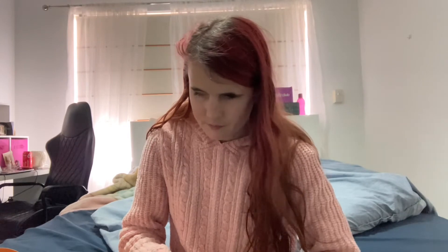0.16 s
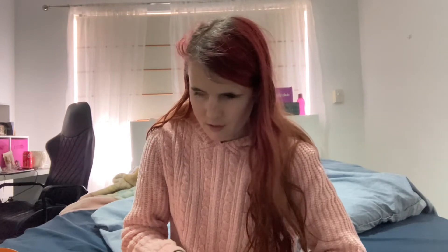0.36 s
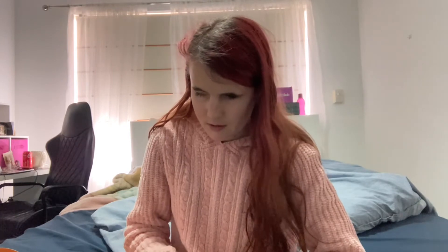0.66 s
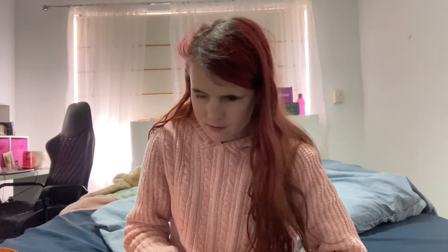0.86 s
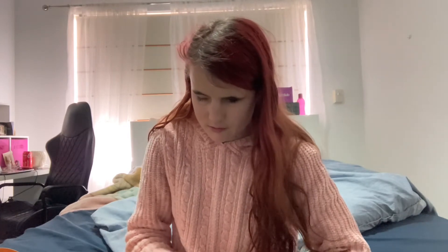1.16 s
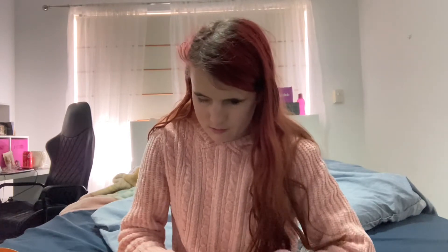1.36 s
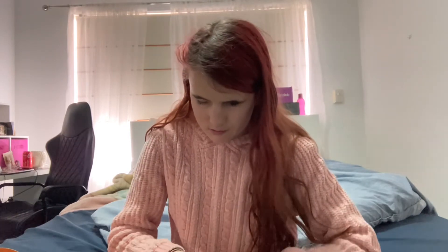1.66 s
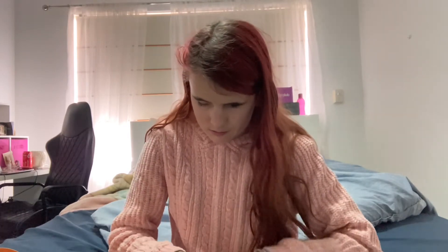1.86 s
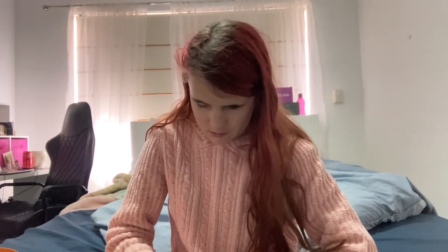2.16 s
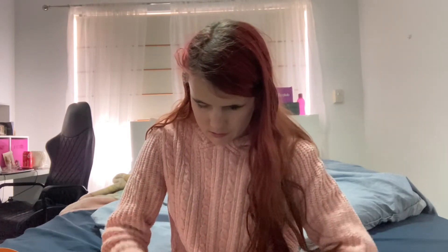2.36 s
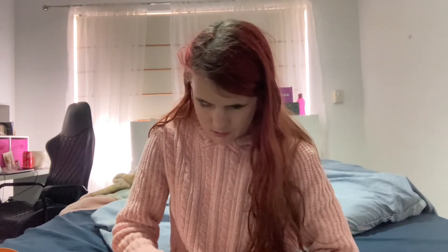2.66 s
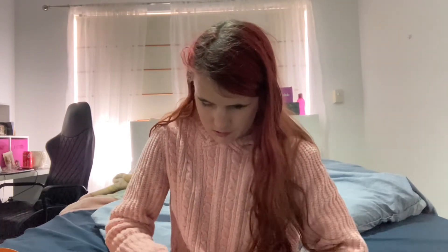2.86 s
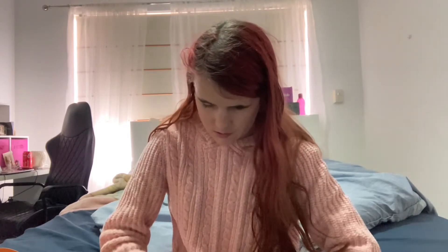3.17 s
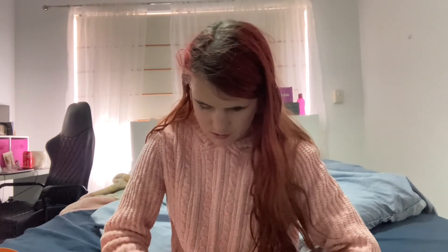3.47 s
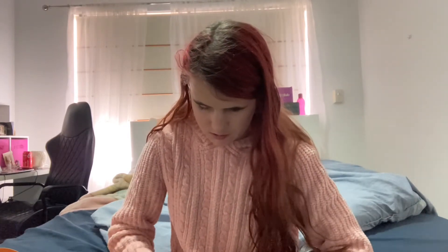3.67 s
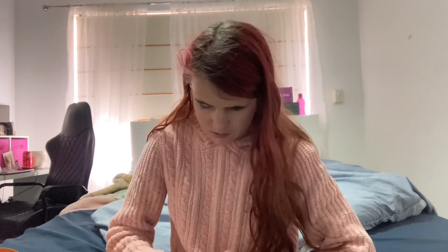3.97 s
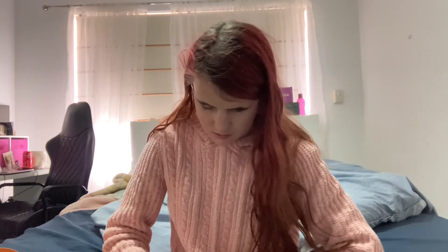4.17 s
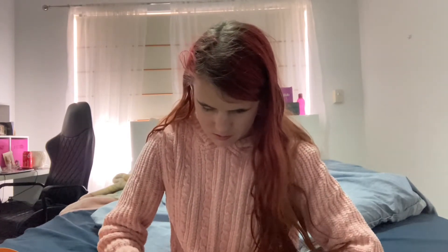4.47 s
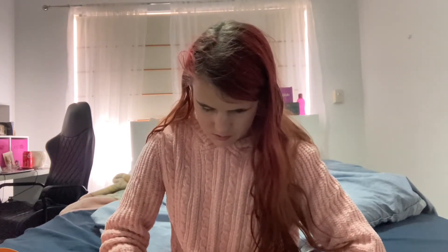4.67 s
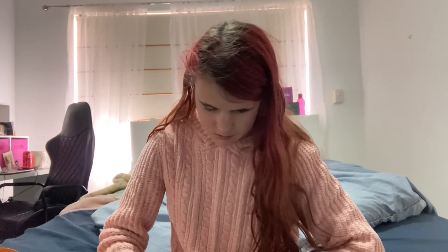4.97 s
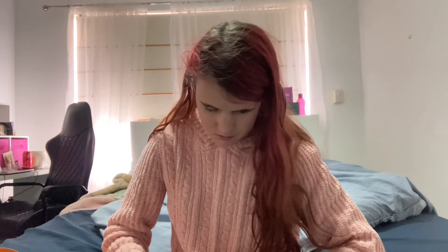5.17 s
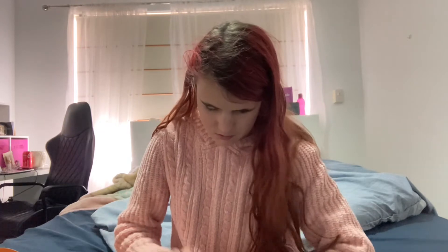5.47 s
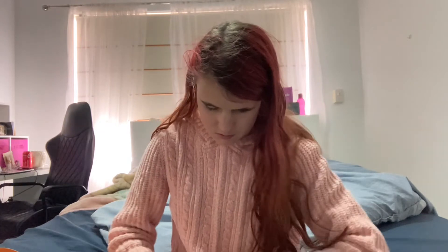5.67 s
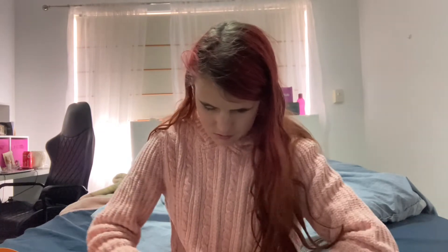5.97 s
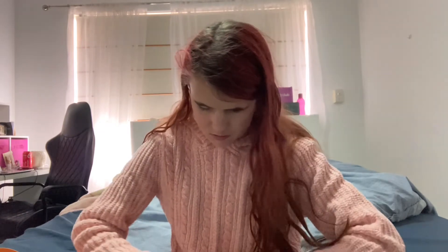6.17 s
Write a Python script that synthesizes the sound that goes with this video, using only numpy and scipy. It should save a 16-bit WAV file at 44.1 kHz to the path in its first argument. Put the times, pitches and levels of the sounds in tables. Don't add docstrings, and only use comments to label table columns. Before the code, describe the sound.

Stiff plastic sweet wrapper crackles close up in a small bedroom, sparse bright snaps first, then a hard squeeze, crumpling and a final burst.

```python
import sys
import numpy as np
from scipy import signal
from scipy.fft import rfft, irfft, next_fast_len
from scipy.io import wavfile

SR = 44100
rng = np.random.default_rng(int(sys.argv[2]) if len(sys.argv) > 2 else 0)


def master(y):
    cut = np.clip(np.atleast_2d(y).T, -1, 1)
    pcm = np.round(cut * 32767)
    wavfile.write(sys.argv[1], SR, pcm.astype(np.int16))


def amplitude_ratio(level_db):
    exponent = np.asarray(level_db, float) / 20
    return 10 ** exponent


N = 279153


def shape(x, table, to_gain):
    size = next_fast_len(x.shape[-1] + 4096)
    hz, value = np.transpose(table)
    axis_hz = np.arange(size // 2 + 1) * SR / size + 1
    gain = to_gain(np.interp(np.log(axis_hz), np.log(np.maximum(hz, 1)), value))
    return irfft(rfft(x, size) * gain, size)[..., :x.shape[-1]]


def scatter(start_s, rows):
    at = (start_s * SR).astype(int)[:, None] + np.arange(rows.shape[1])
    return np.bincount(at.ravel(), rows.ravel(), N + 8192)[:N]


def colour(table):
    points_hz, points_db = np.transpose(table)
    return lambda hz: amplitude_ratio(np.interp(np.log(hz), np.log(points_hz), points_db))


# pitch in Hz, gain in dB.
FILM_VOICE = [(150, 0), (400, 8.5), (1500, 6.5), (4000, 8.5), (6500, 6), (10000, -3)]


def panel(centre_hz, slope_db):
    return lambda hz: colour(FILM_VOICE)(hz) * amplitude_ratio(-slope_db * abs(np.log2(hz / centre_hz[:, None])))


def rings(start_s, db, hz, cycles, sag, size):
    turns = hz[:, None] * np.arange(size) / SR
    swell = (1 - np.exp(-turns / 0.76)) * np.exp(-turns / cycles)
    wave = np.sin(2 * np.pi * np.log1p(sag * turns) / sag)
    return scatter(start_s, amplitude_ratio(db)[:, None] * swell * wave)


def cracks(start_s, db, decay_s, size, gain, rise_s=0.000065, first=6):
    lead = 64
    t = np.arange(size) / SR
    envelope = (1 - np.exp(-t / rise_s)) * np.exp(-t / decay_s)
    slips = np.clip(rng.standard_normal((len(start_s), size)), -1.6, 1.6) ** 3 * envelope
    slips[:, 4] += first
    click = slips * (np.arange(size) == 4)
    heard = []
    for rows in (slips, click):
        rows = np.pad(rows, ((0, 0), (lead, 512 - size - lead)))
        rows = irfft(rfft(rows) * gain(np.arange(257) * SR / 512 + 1))
        rows = rows / np.sqrt(np.sum(rows ** 2, axis=1, keepdims=True))
        heard.append(scatter(np.maximum(start_s - lead / SR, 0), amplitude_ratio(db)[:, None] * rows))
    return np.array(heard)


# pitch in Hz, density in dB per Hz.
HUSH_COLOUR = [(15, -52), (25, 0), (76, -5.5), (979, -31.5), (2020, -38), (6620, -34), (9030, -28.5),
               (10800, -60), (12000, -49), (15600, -61), (22000, -120)]


def hush():
    noise = shape(rng.standard_normal((2, N)), HUSH_COLOUR, amplitude_ratio)
    return noise * amplitude_ratio(-72.5) / noise.std()


# pitch in Hz, time to fall 60 dB in seconds.
ROOM_DECAY = [(200, 0.67), (1000, 0.27), (3000, 0.25), (8000, 0.25), (16000, 0.26)]
# pitch in Hz, level in dB.
ROOM_COLOUR = [(200, -18.5), (700, -21.5), (2500, -16.5), (6000, -22.5), (9000, -27.5), (13000, -32),
               (16000, -36)]


def tail():
    t = np.arange(SR // 2) / SR
    decay_hz, decay_s = np.transpose(ROOM_DECAY)
    out = 0
    for hz in 125 * 2. ** np.arange(8):
        band = shape(rng.standard_normal(len(t)), [(hz / 2, 0), (hz, 1), (hz * 2, 0)], np.sqrt)
        t60 = np.interp(np.log(hz), np.log(decay_hz), decay_s)
        out = out + band * amplitude_ratio(-60 * t / t60)
    gather = 1 - np.exp(-(t / 0.004) ** 2)
    return shape(out * gather, ROOM_COLOUR, amplitude_ratio) * amplitude_ratio(-12.0)


def room(bag, count):
    place = np.repeat(rng.integers(0, count, N // 1024 + 1), 1024)[:N]
    return sum(signal.fftconvolve(bag * (place == k), tail())[:N] for k in range(count))


# delay in seconds, level in dB.
ECHOES = [
    (.0029, -24),
    (.0096, -22.5),
]


def nearby(bag):
    return bag + sum(amplitude_ratio(db) * np.roll(bag, int(delay_s * SR)) for delay_s, db in ECHOES)


# pitch in Hz, time to fall 60 dB in seconds, level in dB.
DESK_HUM = (62, 0.86, -45)


def bump():
    hz, t60, db = DESK_HUM
    t = np.maximum(np.arange(N) / SR - 5.293, 0)
    envelope = (1 - np.exp(-t / 0.022)) * amplitude_ratio(-60 * t / t60)
    return amplitude_ratio(db) * envelope * np.sin(2 * np.pi * hz * t)


# start in seconds,
# level in dB, pitch in Hz.
PUFFS = [(0.388, -52.5, 483), (0.535, -57, 520), (0.645, -47, 536), (1.048, -47, 392), (1.146, -46, 526),
         (1.418, -42.5, 555), (1.9, -49, 463), (2.156, -47.5, 557), (2.282, -36, 640), (2.307, -37, 365),
         (2.487, -39.5, 514), (2.846, -41.5, 526), (3.237, -34.5, 510), (3.413, -41.5, 490),
         (3.539, -39, 480), (3.599, -35.5, 527), (3.837, -42.5, 496), (3.883, -39, 554), (4.149, -44, 450),
         (4.172, -44.5, 418), (4.327, -47, 530), (4.658, -48.5, 396), (5.289, -42, 496), (5.6, -45.5, 480),
         (5.812, -40, 608), (6.084, -44, 480), (6.123, -39, 464), (6.259, -34, 332), (6.285, -30.5, 490),
         (2.29, -39.5, 119), (5.3, -44, 123)]


def puffs():
    start_s, db, hz = np.transpose(PUFFS)
    return rings(start_s, db + 11.5, hz, cycles=1.3, sag=0.0017, size=1500)


def unrest(at, steady_db, snap_db):
    settle_s = 0.019
    since = at[:, None] - np.transpose(SNAPS)[0]
    settling = np.where(since > 0, amplitude_ratio(snap_db) * np.exp(-abs(since) / settle_s), 0)
    return 10 * np.log10(amplitude_ratio(steady_db) ** 2 + np.sum(settling ** 2, axis=1))


# time in seconds, effort in dB.
KNEADING = [(0, -71), (.36, -53.5), (.52, -56), (.78, -62), (1.75, -55.5), (2.32, -45), (2.68, -44.5),
            (2.92, -64), (3.05, -41), (3.38, -35), (3.641, -50), (3.76, -44.5), (4.2, -44.5), (4.9, -59),
            (5.3, -52.5), (5.7, -51.5), (6.08, -35.5), (6.33, -49)]
# pitch in Hz, gain in dB.
CRACK_COLOUR = [(2000, -18), (4000, -9.5), (6000, 6.5), (8000, 10), (9500, 12.5), (12000, 9.5),
                (14000, 0.5), (16500, -6.5)]


def rustle(count):
    knead_s, knead_db = np.transpose(KNEADING)
    _, crack_db, _, ring_db = np.transpose(SNAPS)
    bright_at, bright_luck, dull_at, dull_luck, pitch = rng.random((count, 5)).T

    at = bright_at * N / SR
    effort_db = np.interp(at, knead_s, knead_db)
    steady_db = -5.5 - 67.5 + 1.7866 * (effort_db + 55.5)
    level_db = unrest(at, steady_db, crack_db - 36)
    level_db = level_db - 3 * np.log(np.maximum(bright_luck, .15)) + 13
    bright = cracks(at, level_db, decay_s=0.00063, size=60, gain=colour(CRACK_COLOUR))

    at = dull_at * N / SR
    effort_db = np.interp(at, knead_s, knead_db)
    level_db = unrest(at, effort_db - 7, ring_db - 4.5)
    level_db = level_db - 3 * np.log(np.maximum(dull_luck, .12)) + 10.0
    patch = panel(450 * amplitude_ratio(27.1 * pitch), slope_db=7.5)
    return bright + cracks(at, level_db, decay_s=0.000098, size=200, gain=patch)


def creak(bag, size):
    swell = rng.standard_normal(size) * np.exp(-np.arange(size)[::-1] / SR / 0.0067)
    return amplitude_ratio(-40) * signal.fftconvolve(bag, swell)[size:size + N]


# start in seconds, crack level in dB, ring of the film in Hz, ring level in dB.
CREASES = [(0.0271, -50.5, 2070, -42), (0.1547, -87.5, 3120, -57.0), (0.2453, -39, 3060.0, -35.5),
           (0.2574, -71.0, 2220, -45), (0.3032, -63.5, 2820, -41), (0.3859, -85.0, 820.0, -51.5),
           (0.4189, -28.0, 2320, -28.5), (0.4199, -30, 2300, -47), (0.4506, -15.5, 2030, -29.5),
           (0.4932, -17.5, 3220, -33.5), (0.5026, -38, 2760.0, -53), (0.5224, -29, 2230, -35.5),
           (0.536, -31, 2400, -28.5), (0.5457, -23.5, 3800, -32.0), (0.5495, -33.0, 3100.0, -48),
           (0.5527, -30, 4050.0, -39), (0.6431, -37.5, 2080, -37.5), (0.8303, -67.0, 2000, -45.5),
           (0.8429, -29.5, 4780.0, -44), (0.8589, -58.0, 2800.0, -49), (0.8704, -62, 1890.0, -39),
           (0.8757, -28.5, 3880.0, -29.5), (0.9367, -38, 1640.0, -45.5), (0.9646, -39.5, 4390.0, -47),
           (1.0027, -75, 780, -41.5), (1.0457, -12.5, 2280, -32.5), (1.0482, -35, 2760, -33.5),
           (1.1413, -40, 3010.0, -46), (1.144, -67.0, 1980.0, -41.5), (1.2227, -36, 2380, -57),
           (1.2656, -24.0, 3060, -36), (1.4151, -25, 2340, -34), (1.4991, -34.0, 3730, -37),
           (1.5657, -48, 1510.0, -73.0), (1.5891, -47, 1860, -65), (1.5913, -67.0, 1770.0, -50),
           (1.5953, -53, 805, -55.0), (1.6745, -49, 806, -48), (1.6987, -42, 2800, -53),
           (1.7099, -46, 3800, -33.5), (1.7152, -46, 2600, -41), (1.8048, -68.0, 806, -44.5),
           (1.8312, -36, 1850, -38.5), (1.861, -40, 3790.0, -52), (1.8698, -49, 1640.0, -55),
           (1.8801, -47, 4480.0, -48), (1.8965, -20, 3850, -33), (1.9229, -42, 2200, -34.5),
           (1.931, -54, 2540.0, -36.5), (2.0145, -21.5, 3230.0, -31.0), (2.0426, -42, 2800, -42),
             (2.0541, -34.0, 3230.0, -51.0), (2.108, -30, 2210, -32), (2.1561, -33, 2220, -34),
             (2.166, -25, 2600, -42), (2.1923, -55, 3660.0, -36), (2.2023, -20.5, 2110.0, -35.5),
             (2.2323, -28, 4780.0, -51), (2.2555, -19.0, 4610.0, -33), (2.273, -23, 3010.0, -28),
             (2.2835, -22, 2170, -20), (2.285, -3.5, 2160, -28), (2.2871, -9.5, 2920, -22.5),
             (2.2917, -19, 2970.0, -23), (2.2937, -15.0, 2870, -30), (2.2988, -8, 3140, -21.5),
             (2.301, -15, 3050, -31), (2.3025, -39, 2930, -18.5), (2.3051, -23, 3000, -26),
             (2.3147, -32, 3120, -38), (2.3637, -43, 2220, -33), (2.3699, -21, 2130, -26.5),
             (2.3735, -26, 1360, -42), (2.3779, -34.5, 2890, -28.5), (2.3966, -22, 2650, -28.5),
             (2.4073, -23, 2160, -31), (2.416, -25.5, 4780.0, -26.5), (2.421, -30, 4770, -34),
             (2.4802, -36.0, 2970.0, -39), (2.4867, -20.0, 2230, -26.0), (2.5076, -22.5, 1430, -33.5),
             (2.5515, -34, 820.0, -59.0), (2.5687, -33.5, 3830.0, -43), (2.6098, -42.0, 2060, -33.5),
             (2.731, -37, 3320, -43.0), (2.7328, -31.5, 3700.0, -38), (2.7847, -42.0, 3250, -38),
             (2.7916, -33, 1490, -45), (2.8379, -40, 1110, -43), (2.8437, -37.0, 1100, -27.5),
             (2.8471, -26, 820.0, -39), (2.85, -41, 1210.0, -47), (2.88, -38.0, 3360.0, -53),
             (2.933, -34.5, 2000, -38), (2.9706, -30.0, 3300, -29), (2.9867, -29, 3100, -35),
           (2.9894, -34, 3100, -34), (2.9914, -37, 734, -42), (2.9933, -34, 3010.0, -35),
             (3.0017, -26, 1265, -33.5), (3.0218, -23.5, 2610, -28.0), (3.0436, -30, 2410.0, -44),
             (3.0498, -31.0, 2020.0, -44), (3.0532, -23.5, 3660, -30), (3.0886, -29, 1130, -35.5),
             (3.114, -28, 1830, -37), (3.1386, -41, 1320, -43), (3.1785, -23.5, 1280, -25.5),
             (3.1909, -26, 1150, -32), (3.2057, -36, 2230, -28.5), (3.2212, -46, 2000, -37),
             (3.2242, -22.5, 1270, -24.5), (3.2493, -23, 1900, -32), (3.2532, -47.0, 1950, -29.5),
             (3.2586, -22.5, 1890.0, -34), (3.273, -29, 1290.0, -49), (3.3054, -26.0, 3600, -31),
             (3.3098, -33, 2190, -27.5), (3.312, -34, 1200, -41), (3.3188, -19.0, 3080, -33),
             (3.3328, -17.5, 2800.0, -26.5), (3.3413, -32, 3010.0, -41.0), (3.3462, -33, 2930, -36),
             (3.346, -28, 2500.0, -44), (3.364, -31, 2630.0, -37), (3.3745, -27.5, 4780.0, -46),
             (3.392, -35.0, 2450.0, -45.0), (3.3957, -33, 2370.0, -57.0), (3.3993, -33, 2630.0, -45),
             (3.4036, -29, 2200.0, -52), (3.4071, -30, 2450.0, -49), (3.4118, -53.0, 1890.0, -34),
             (3.4144, -27.0, 4100, -38), (3.4187, -32, 2110.0, -48), (3.439, -33, 1810.0, -47),
             (3.468, -25, 2640, -29.5), (3.4834, -32.0, 2200, -35), (3.51, -26.5, 1130, -34.5),
             (3.5119, -36, 2630.0, -32), (3.5151, -30, 1410, -40), (3.5373, -21, 2430, -28.5),
             (3.5616, -36.0, 4830, -40), (3.566, -41, 1860, -30), (3.5767, -27, 2500.0, -43),
           (3.5812, -27.0, 1740, -25), (3.5814, -23, 1710, -33), (3.5861, -33.0, 1850.0, -44.0),
           (3.5946, -23.5, 1810.0, -34), (3.609, -31, 1240, -27.5), (3.6175, -11, 2780, -25),
           (3.6384, -28, 1290.0, -33), (3.6544, -27, 4630, -30.5), (3.755, -47, 3130, -48),
           (3.7808, -38.5, 2370.0, -51.0), (3.793, -35, 1240, -43.5), (3.8009, -31, 3960.0, -39),
           (3.8039, -39, 2890.0, -51.0), (3.813, -39, 4180.0, -48.0), (3.8166, -44, 1190, -42.5),
           (3.8248, -30.5, 1280, -47), (3.8287, -39.0, 3500, -40.5), (3.8368, -34, 1380.0, -43),
           (3.8653, -31, 3570.0, -37.5), (3.881, -38, 1140, -30.5), (3.9312, -35, 1790, -36.5),
           (3.9726, -32.5, 2000, -36), (3.9828, -31.0, 1230, -35), (4.008, -53, 1870, -40),
           (4.0287, -40, 1090, -43), (4.079, -34.5, 1900, -39.5), (4.1074, -33.5, 2070, -34.5),
           (4.1532, -39.0, 2110.0, -41), (4.157, -30, 820.0, -50), (4.1697, -22.0, 3060.0, -32),
           (4.172, -28, 1080.0, -42), (4.1776, -27, 1080.0, -36.5), (4.2158, -52.0, 2020.0, -34),
           (4.2515, -35, 1840, -41), (4.2538, -35, 2780, -36.5), (4.2775, -28.5, 2020.0, -42),
           (4.2849, -62.0, 1380.0, -37), (4.2896, -31.0, 1850.0, -47), (4.359, -18.5, 4220, -29),
           (4.4726, -44.0, 2930.0, -48.0), (4.4816, -55.0, 1230, -43.5), (4.4924, -22.5, 3070, -38.5),
           (4.566, -42, 3100, -45.5), (4.57, -44, 2800.0, -47), (4.5846, -38, 2800.0, -45),
           (4.5977, -44, 2840.0, -49), (4.6035, -35.0, 2230, -47),
           (4.6073, -43, 2850, -40), (4.6108, -30, 3770, -47.0), (4.6557, -37, 2760.0, -40),
           (4.6593, -17.0, 2770, -21), (4.6627, -41.0, 3140, -40), (4.6746, -28, 3160, -37.0),
           (4.6833, -28.0, 3000, -43), (4.6865, -29, 2020.0, -48), (4.693, -34, 2020.0, -46),
           (4.7065, -34, 4260.0, -49.0), (4.7113, -36.0, 3600, -50), (4.7177, -36, 2020.0, -45.0),
           (4.734, -33, 4530, -43.5), (4.78, -43, 2890.0, -46), (4.7984, -39.5, 1280, -38.5),
           (4.8244, -38.0, 3550, -35), (4.877, -48, 2670.0, -53), (4.8805, -46, 2630, -52),
           (4.8976, -76.0, 1640.0, -40.5), (4.9052, -41, 2650, -43), (4.9798, -24, 2370.0, -43),
           (4.9876, -33, 2430, -35.5), (5.0025, -29, 2370, -43.5), (5.0282, -27, 4780.0, -51),
           (5.037, -26.5, 2200.0, -49), (5.0726, -35, 4670, -31.5), (5.074, -30, 1640.0, -52),
           (5.0894, -36, 3790.0, -56), (5.1509, -41, 4130.0, -39.0), (5.1726, -49.0, 3010.0, -75),
           (5.195, -38, 3500, -56), (5.2023, -43, 3920.0, -62.0), (5.214, -41, 4390.0, -80),
           (5.236, -45, 1226, -37.0), (5.2416, -30, 4970, -30), (5.286, -35, 2550, -45),
           (5.287, -38, 2580, -36.5), (5.3037, -28.5, 3290, -30), (5.3115, -26.5, 2490, -45.0),
           (5.3237, -60.0, 3120, -37.0), (5.3465, -37, 1000, -40.5), (5.3774, -29.0, 2460, -33.5),
           (5.4032, -41, 1590.0, -59.0), (5.4157, -34, 2230, -37), (5.4463, -40.0, 2330.0, -65.0),
           (5.4506, -44, 4310.0, -75), (5.4682, -38, 1510.0, -46.0),
           (5.4806, -41.0, 1550, -47.5), (5.5681, -45, 3600, -40), (5.5893, -61.0, 3360.0, -39.5),
             (5.6068, -40, 2110.0, -39), (5.611, -59, 1215, -41.5), (5.6133, -43.0, 1030.0, -56),
             (5.623, -42, 1850, -32.5), (5.6981, -41, 1110, -39.5), (5.7063, -33.5, 1710, -40),
             (5.7632, -46, 3400, -41), (5.7948, -49, 2000, -40.5), (5.8104, -40, 3080, -32),
             (5.8152, -41, 830, -44), (5.8291, -31, 2410.0, -40), (5.833, -45.0, 1070, -44),
             (5.8558, -36.0, 2200.0, -35.0), (5.8615, -29, 1100, -43), (5.9104, -40, 1380.0, -61.0),
             (5.9228, -33.5, 2760.0, -57), (5.9429, -35.0, 3760, -33.5), (5.9608, -31.0, 1960, -35),
             (5.9683, -31.5, 3740, -33), (5.9733, -24, 1120, -33), (5.9777, -29.5, 3570.0, -39),
             (5.995, -39, 3700.0, -43.0), (6.0098, -42.0, 3860, -38), (6.0465, -52, 2630.0, -62.0),
             (6.0516, -36.0, 3920.0, -38), (6.06, -56.0, 2200.0, -43), (6.066, -34, 3340, -43),
             (6.0706, -36, 3400.0, -46.0), (6.0896, -35.0, 3620.0, -43), (6.1071, -35, 2240, -31),
             (6.1219, -48, 2110, -31.5), (6.1343, -16.5, 2240, -27), (6.159, -36, 1890.0, -40),
             (6.1946, -49, 2950, -34), (6.2138, -40.0, 2800.0, -59.0), (6.2158, -39, 2800.0, -59.0),
             (6.2264, -31, 2200.0, -39), (6.2305, -52, 1220, -40.5), (6.2564, -24, 2930.0, -30),
             (6.2593, -25, 2470, -36.0), (6.2604, -19.5, 2610, -26.5), (6.2835, -18.5, 2200.0, -29.0),
             (6.295, -29, 2060, -24.5), (6.2995, -24, 3100, -40)]
SNAPS = CREASES


def snaps(table):
    start_s, crack_db, hz, ring_db = np.transpose(table)
    start_s = start_s + .0008
    ring_db = ring_db + 5
    late_s = 1.3 / hz

    ring = rings(start_s + late_s, ring_db, hz, cycles=2.8, sag=0.0019, size=400)
    ring = ring * amplitude_ratio(np.array([[0], [-21]]))
    slap = cracks(start_s + .7 * late_s, ring_db + 9, decay_s=.0007, size=200,
                  gain=panel(hz, slope_db=7), rise_s=0.00051, first=1.04)

    def sharp(f):
        octaves = np.log2(np.maximum(f / 9000, 1))
        return colour(CRACK_COLOUR)(f) * amplitude_ratio(0.1 * (crack_db[:, None] + 22) * octaves)

    snap = cracks(start_s, crack_db + 15.0, decay_s=.0005, size=110, gain=sharp) + slap + ring
    snap[0] += creak(np.pad(snap[0], (0, 700)), size=700)
    return snap


# pitch in Hz, gain in dB.
BAG_TONE = [(80, -24), (200, -3), (350, -1)]
# pitch in Hz, level in dB.
PORT_OWN = [(60, -10.5), (300, -11), (1500, -4.5), (5000, -4), (9000, -11), (16000, 5)]


def scene():
    film = snaps(SNAPS) + rustle(count=1500)
    bag, spread = shape(film + puffs(), BAG_TONE, amplitude_ratio)
    shared_hush, own_hush = hush()
    own = shape(room(spread, count=4) * amplitude_ratio(4.0) + own_hush, PORT_OWN, amplitude_ratio)
    both = nearby(bag) + room(spread, count=6) + bump() + shared_hush
    return np.array([both + own, both - own])


# pitch in Hz, lead of the left port in radians.
PORT_LEAD = [(560, 0), (690, 3.4), (780, 4.9), (1000, 5.9), (2000, 5.7), (4000, 5.4), (5000, 5.0),
             (6100, 3.5), (7200, 4.2), (8000, 5.4), (10000, 7.8), (12000, 10.3), (14000, 12.7), (16000, 15)]
# pitch in Hz, left minus right in dB.
PORT_BALANCE = [(60, 1), (300, 0), (1000, -1.3), (2500, -1), (5000, .5), (9000, -.3)]
# pitch in Hz, gain in dB.
MIC = [(20, -57), (45, 2), (70, 2), (15000, 2.5), (16800, 1.5)]


def microphones(dry):
    lagged = shape(dry[1], PORT_LEAD, lambda rad: np.exp(-1j * rad))
    right = shape(lagged, PORT_BALANCE, lambda db: amplitude_ratio(-db))
    return shape(np.array([dry[0], right]), MIC, amplitude_ratio)


def band_limit(x):
    return signal.sosfilt(signal.butter(12, 16830, fs=SR, output="sos"), x)


def record(dry):
    mix = 0.78 * np.tanh(microphones(dry) / 0.81)
    return band_limit(mix)


dry = scene()
out = record(dry)
master(out)
```